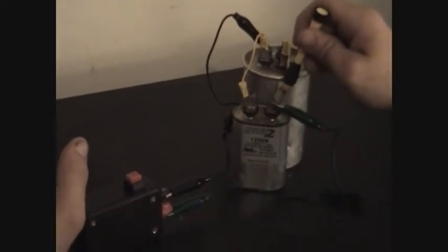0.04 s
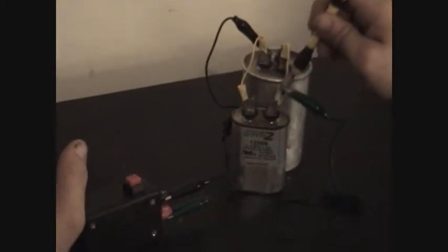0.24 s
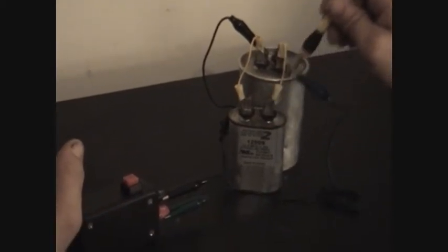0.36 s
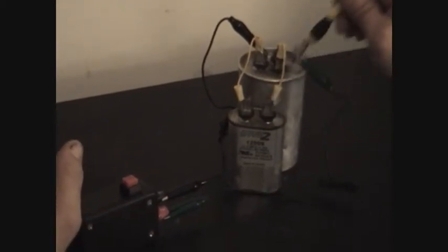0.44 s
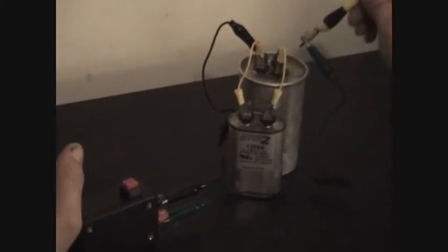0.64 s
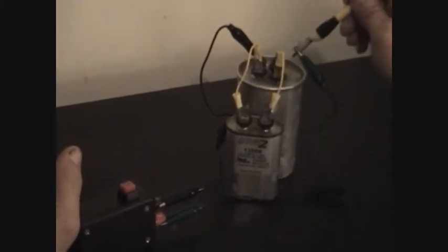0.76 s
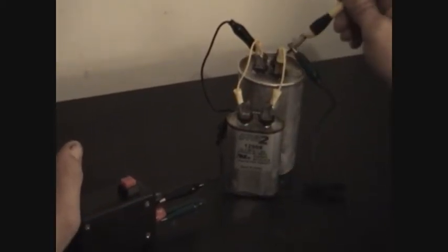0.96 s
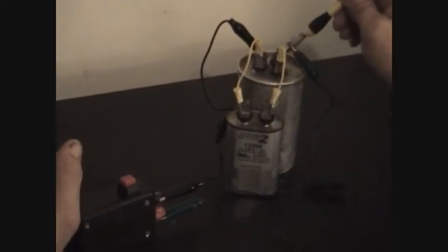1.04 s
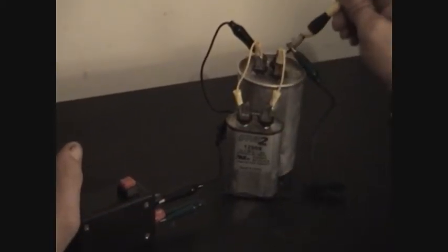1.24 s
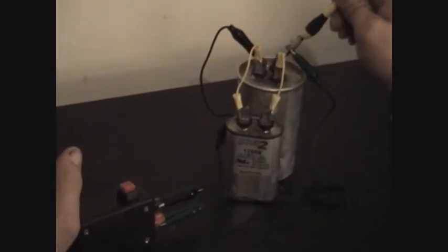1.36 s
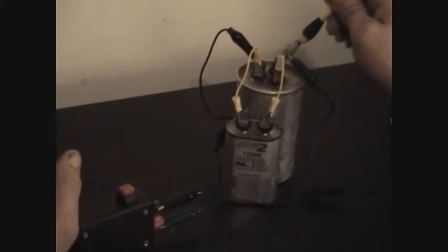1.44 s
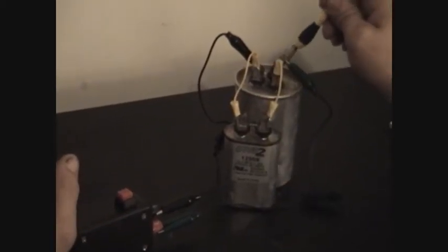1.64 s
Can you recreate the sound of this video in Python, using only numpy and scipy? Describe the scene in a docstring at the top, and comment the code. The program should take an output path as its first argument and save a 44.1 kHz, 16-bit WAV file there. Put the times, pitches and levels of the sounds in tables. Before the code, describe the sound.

A single sharp spark snaps as charged capacitors are shorted on a table, with a slight thump and a brief small-room ring. Faint hiss, mains hum and cooling fan tones continue behind it, close to the microphone.

```python
"""One spark snaps as charged capacitors are shorted on a table. The crack and its first reflections
ring the microphone ports, the pressure step overloads them with a thump, and a small room rings out.
Behind it run electronics: hiss, mains hum and two cooling fans whose blade tones beat slowly
against each other. A soft bass rumble swells once after the spark."""
import sys
import numpy as np
from scipy import signal
from scipy.fft import rfft, irfft, next_fast_len
from scipy.io import wavfile
from scipy.ndimage import map_coordinates

SR = 44100
rng = np.random.default_rng(int(sys.argv[2]) if len(sys.argv) > 2 else 0)


def int16_out(signal):
    """Quantize to a 16-bit WAV file."""
    q = np.round(np.clip(np.atleast_2d(signal).T, -1, 1) * 32767)
    wavfile.write(sys.argv[1], SR, q.astype(np.int16))


N = 74970
TIME = np.arange(N) / SR
SPLIT = np.array([[.5], [-.5]])  # shares a difference between left and right


def amp(db):
    """Decibels to gain."""
    return 10 ** (np.asarray(db) / 20)


def unit(x):
    """Scale to rms 1."""
    return x / np.sqrt(np.mean(x ** 2) + 1e-20)


def since(start):
    """Seconds since start, zero before it."""
    return np.maximum(TIME - start, 0)


def along(points, hz):
    """Read a curve on a log frequency axis."""
    freqs, values = np.transpose(points)
    return np.interp(np.log(hz + 1), np.log(freqs + 1), values)


def wobble(rate):
    """A smooth random curve, rate knots a second."""
    knots = rng.standard_normal(int(N * rate / SR) + 4)
    return map_coordinates(knots, [TIME * rate])


def filtered(x, response):
    """Zero-phase EQ with a gain of response(hz)."""
    size = next_fast_len(N + SR // 2)
    return irfft(rfft(x, size) * response(np.fft.rfftfreq(size, 1 / SR)), size)[..., :N]


def eq_impulse(eq, size=512):
    """A minimum-phase impulse of energy 1, coloured by an EQ curve."""
    cepstrum = irfft(np.log(amp(along(eq, np.fft.rfftfreq(size, 1 / SR)))))
    cepstrum[1:size // 2] *= 2
    cepstrum[size // 2 + 1:] = 0
    impulse = irfft(np.exp(rfft(cepstrum)))
    return impulse / np.linalg.norm(impulse)


def noise(gain, correlation):
    """Stereo noise of rms 1 with a gain and a left-right correlation per frequency."""
    def mid_side_gain(hz):
        width = np.arccos(np.clip(along(correlation, hz), -1, 1)) / 2
        return gain(hz) * np.array([np.cos(width), np.sin(width)])
    mid, side = filtered(rng.standard_normal((2, N)), mid_side_gain)
    return unit(np.array([mid + side, mid - side]))


# Colour of the noise bed: (frequency [Hz], relative level [dB])
BED_EQ = [(20, -20.5), (40, -5), (60, -13), (85, -10), (135, -7), (200, -11.5), (450, -12), (700, -14),
          (1200, -18), (2100, -22), (3100, -25), (5000, -30.5), (7500, -33.5), (11000, -37), (15000, -44.5)]
# Stereo image of the bed: (frequency [Hz], left-right correlation [-1..1])
BED_IMAGE = [(50, .7), (130, 0.53), (300, -0.25), (700, -0.48), (1400, -0.19), (3000, 0.03), (14000, 0.4)]
# Narrow bands of electronic hiss: (centre [Hz], half width [Hz], level [dB])
CIRCUIT_BANDS = [(2590, 73, -70.5), (6664, 140, -65)]

def hiss(bed_db=-48.5, top_hz=15100):
    """A broad bed of air and circuit noise with two narrow hissing bands."""
    bed = amp(bed_db) * noise(lambda hz: amp(along(BED_EQ, hz)) * (hz < top_hz), BED_IMAGE)
    for centre, width, db in CIRCUIT_BANDS:
        bed += amp(db) * noise(lambda hz: 1 / (1 + ((hz - centre) / width) ** 2), BED_IMAGE)
    return bed


def rumble(peak_s=1.0, sigma_s=0.038, peak_db=-49.5, centre_hz=58, half_width_hz=14):
    """A short, soft swell in the deep bass."""
    band = noise(lambda hz: 1 / (1 + ((hz - centre_hz) / half_width_hz) ** 4), BED_IMAGE)
    swell = np.exp(-((TIME - peak_s) / sigma_s) ** 2 / 2)
    return amp(peak_db) * band * swell


# Mains and fan motor tones: (pitch [Hz], level [dB], waver depth [0..1])
HUM_TONES = [(59, -60.5, 0.8), (120.3, -57, 0), (217.2, -65.5, 0.68), (375.6, -64.5, 0.48),
             (517, -68.5, 0.9), (583.4, -64, 0), (864, -83, 0), (974, -93.5, 1), (2420, -67, 0.7),
             (2508, -71, 0.6), (2590, -67.5, 0), (2673, -67.5, .3), (2847, -64.5, 0), (6450, -71, 0.5),
             (6400, -76, .4)]

def hum(hz_per_radian=500):
    """Mains and motor tones, some wavering; the higher ones reach the two ports out of step."""
    tones = np.zeros((2, N))
    for hz, db, depth in HUM_TONES:
        stereo_phase = SPLIT * min(hz / hz_per_radian, 1.3) * rng.choice([-1, 1])
        carrier = np.exp(1j * (2 * np.pi * hz * TIME + stereo_phase))
        waver = 1 + depth * (wobble(9.15) + 1j * wobble(8.98))
        tones += amp(db) * unit(np.real(waver * carrier))
    return tones


# Fader ride on both fans: (time [s], level [dB])
FAN_FADER = [(0, -2), (.4, -1.5), (1.1, 1.14), (1.7, 1)]

def fans(blade_hz=656.7, beat_hz=1.53, dip_s=.77, first_db=-53, second_db=-55.5, stereo_rad=0.65):
    """Two blade tones, beat_hz apart, reinforce and partly cancel each other in turn."""
    phase = 2 * np.pi * blade_hz * TIME + stereo_rad * SPLIT
    drift = np.pi * beat_hz * (TIME - dip_s)
    pair = amp(first_db) * np.sin(phase + drift) - amp(second_db) * np.sin(phase - drift)
    return np.sqrt(2) * pair * amp(np.interp(TIME, *np.transpose(FAN_FADER)))


# Colour of the reverb: (frequency [Hz], relative level [dB])
REVERB_EQ = [(60, -3), (150, -23), (330, -9.5), (600, -14.5), (850, -11), (1300, -6.5), (1900, -7.5),
             (2600, -1.5), (3300, -5.5), (4200, -3.5), (5300, -1), (7500, 0.5), (10200, -1), (12000, -6.5),
             (14300, -12.5), (15400, -17.5), (16200, -47)]
# Stereo image of the reverb: (frequency [Hz], left-right correlation [-1..1])
REVERB_IMAGE = [(100, 0.49), (1200, .25), (4000, 0.42), (14000, 0.45)]
# Lean of the reverb: (frequency [Hz], left over right [dB])
REVERB_PAN = [(200, 6), (700, -8), (1300, 6), (2400, 2), (5000, 2), (14000, 0.5)]
# Main decay of the room: (frequency [Hz], T60 [s])
REVERB_DECAY = [(150, .3), (1000, 0.25), (3000, 0.24), (5500, 0.24), (9000, 0.21), (14000, 0.17)]

def room(level_db=-19, build_s=0.034, build_db=1.5, late_db=-25, late_t60=0.73, grain_db=0.3):
    """Dense echoes of the snap pile up, then each band dies at its own speed over a faint, slow tail."""
    echoes = noise(lambda hz: amp(along(REVERB_EQ, hz)), REVERB_IMAGE)
    echoes = filtered(echoes, lambda hz: amp(along(REVERB_PAN, hz) * SPLIT))
    echoes = unit(echoes * amp(grain_db * wobble(1800)))
    hz, frame_s, bands = signal.stft(echoes, SR, nperseg=256)
    past_peak = frame_s - SPARK_S - build_s
    build = amp(build_db * np.minimum(past_peak, 0) / build_s)
    fall_s = np.maximum(past_peak, 0)
    main = amp(-60 * fall_s / along(REVERB_DECAY, hz)[:, None])
    late = amp(late_db - 60 * fall_s / late_t60)
    tail = signal.istft(bands * np.hypot(main, late) * build, SR, nperseg=256)[1][:, :N]
    fade_in = np.minimum(since(SPARK_S) / 0.0042, 1)
    return amp(level_db) * tail * fade_in


# Overload of the left, then the right microphone port:
# (push [signed gain], push peak time [s], rebound [signed gain], rebound peak time [s])
PORT_SWINGS = [(-.36, 0.00027, .17, 0.00067), (.75, 0.00014, -0.29, 0.00083)]

def thump():
    """The spark's pressure step throws each port one way, and it swings back more slowly."""
    age = since(SPARK_S)
    def lobe(peak_s):
        return (age / peak_s * np.exp(1 - age / peak_s)) ** 2
    return np.array([push * lobe(push_s) + rebound * lobe(rebound_s)
                     for push, push_s, rebound, rebound_s in PORT_SWINGS])


# Direct snap and early reflections: (delay [s], left level [dB], right level [dB], T60 [s])
SNAP_TAPS = [(0, -2.5, 1, 0.0025), (.0017, -3.5, -14.5, 0.0018), (0.025, -17, -24, 0.00087),
             (.029, -14, -27, 0.0029)]
# Colour of the arc's noise burst: (frequency [Hz], relative level [dB])
ARC_EQ = [(100, -21), (1300, -12), (2500, -10), (3800, -16), (5000, -4.5), (6200, -2), (7500, -0.5),
          (10500, -3), (14000, -6), (16500, -33)]
# Resonances of the microphone ports: (pitch [Hz], level [dB], T60 [s])
PORT_RINGS = [(5010, -7.5, 0.0054), (7760, -12, 0.0039), (11000, -30, .002)]
SPARK_S = .1097

def spark(arc_db=-1.5):
    """The arc's tight crack and its bounces off nearby surfaces; each briefly rings the ports."""
    arc, ring = np.zeros((2, N)), np.zeros((2, N))
    for delay, left_db, right_db, t60 in SNAP_TAPS:
        age = since(SPARK_S + delay)
        gain = amp([[left_db], [right_db]])
        arc += gain * (age > 0) * amp(arc_db - 60 * age / t60) * rng.choice([-1, 1], N)
        for hz, db, ring_t60 in PORT_RINGS:
            ring += gain * amp(db - 60 * age / ring_t60) * np.sin(2 * np.pi * hz * age)
    crack = signal.fftconvolve(arc, eq_impulse(ARC_EQ)[None], axes=1)[:, :N]
    return crack + ring


def scene():
    """The spark and its room over the running electronics."""
    return spark() + thump() + room() + hiss() + rumble() + hum() + fans()


def record(dry):
    """A soft clip flattens the crack, then a steep low-pass trims the top end."""
    ceiling, cutoff_hz, slope_width_hz = .95, 16400, 600
    clipped = dry / (1 + np.abs(dry / ceiling) ** 6) ** (1 / 6)
    return filtered(clipped, lambda hz: np.clip((cutoff_hz - hz) / slope_width_hz + .5, 0, 1))


dry = scene()
out = record(dry)
int16_out(out)
```